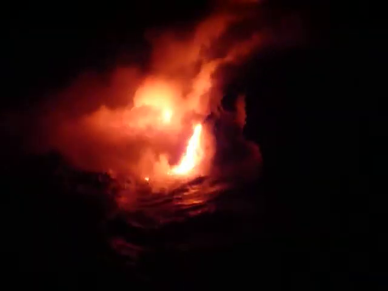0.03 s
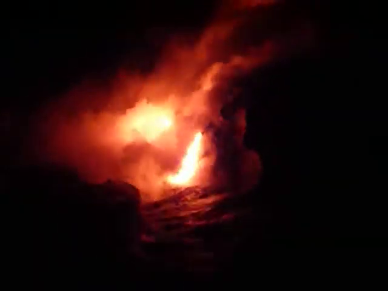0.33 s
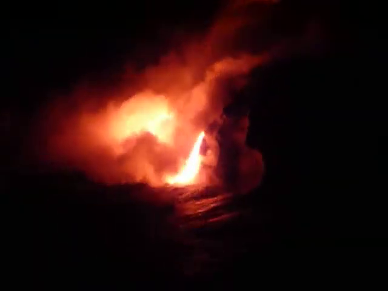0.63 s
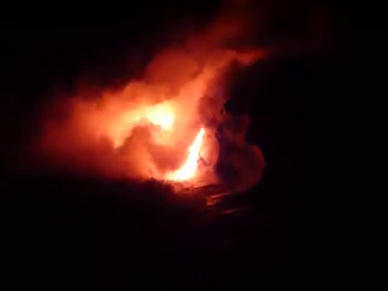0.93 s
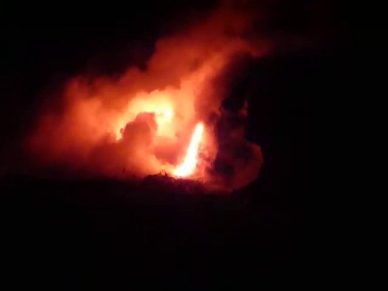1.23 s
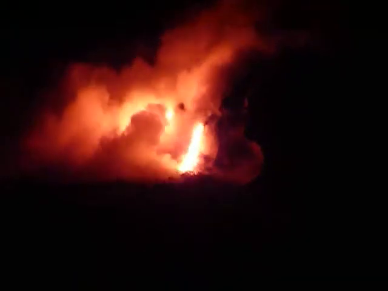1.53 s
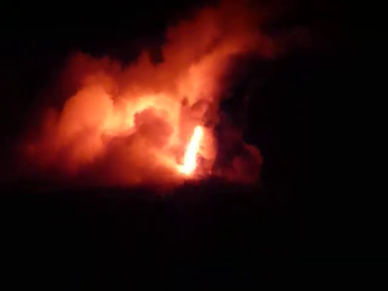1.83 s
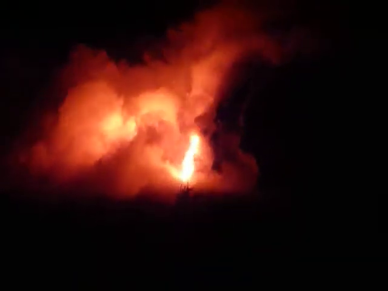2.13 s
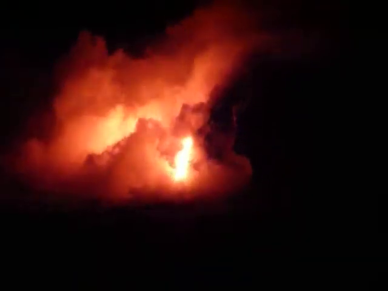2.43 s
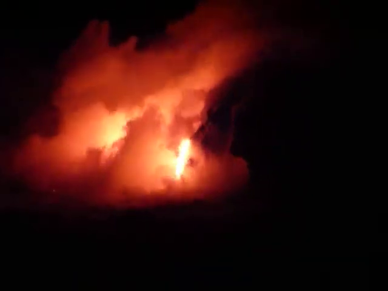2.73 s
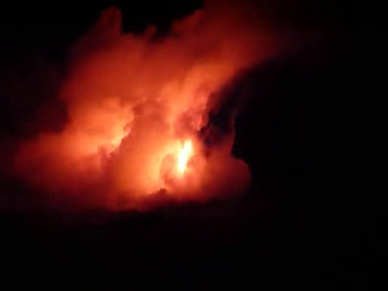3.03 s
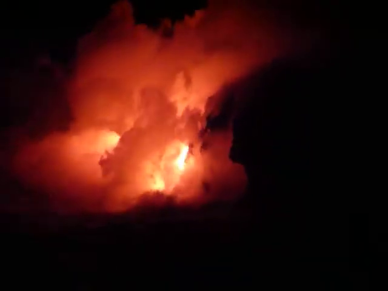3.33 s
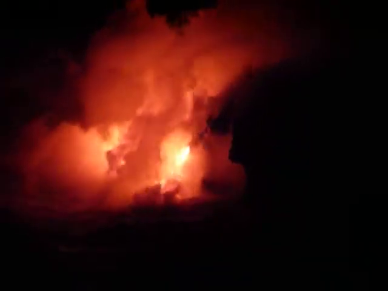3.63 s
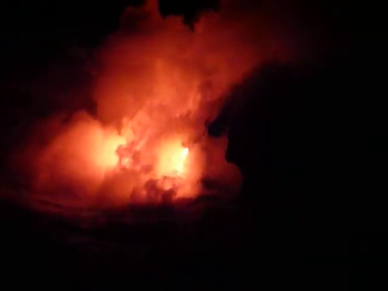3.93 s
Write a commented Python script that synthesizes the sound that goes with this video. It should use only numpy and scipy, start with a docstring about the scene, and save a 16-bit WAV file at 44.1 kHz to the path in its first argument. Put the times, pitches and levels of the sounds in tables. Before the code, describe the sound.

Uneven gusts of wind thump and rasp on an outdoor microphone, with one tiny, close crackle near the start. Underneath, quiet surf and the distant hiss of lava steaming in the sea continue, the hiss rising twice.

```python
"""Gusts buffet a camera's microphone: vortices roll off it, strong eddies thump, rasp and duck its gain.
Some way off, lava pours into the sea at night. Steam hisses, swelling twice as water meets hot rock,
and surf washes the shore. Something small crackles once, close by; two faint ticks come later."""
import sys
import numpy as np
from scipy import signal
from scipy.fft import rfft, irfft, next_fast_len
from scipy.io import wavfile
from scipy.ndimage import uniform_filter1d, map_coordinates

SR = 44100
rng = np.random.default_rng(int(sys.argv[2]) if len(sys.argv) > 2 else 0)


def transcribe(u):
    """Save the signal u as a 16-bit wav file named by the first command-line argument.

    u: samples, shape (n,) or (channels, n), limited to [-1, 1]; the rate is SR.
    q: integer samples, one column per channel.
    """
    v = np.clip(np.atleast_2d(u).T, -1, 1)
    q = np.round(v * 32767).astype(np.int16)
    wavfile.write(sys.argv[1], SR, q)


N = 176400

# Gusts at the microphone. Each row: start in seconds, length in seconds, level in dB, rumble pitch in Hz.
GUSTS = [(0, 0.004, -8.5, 252.6), (0.021, 0.034, -22.5, 191), (0.069, 0.044, -21.5, 172),
         (0.112, 0.032, -41, 146), (0.154, 0.018, -31.5, 245), (0.184, 0.035, -35.5, 189),
         (0.281, 0.11, -28, 179.7), (0.365, 0.018, -23.5, 232.7), (.41, 0.052, -30, 158),
         (0.588, 0.061, -36.5, 136.4), (0.714, 0.0077, -22.5, 190), (0.747, 0.085, -28.5, 168.9),
         (0.786, 0.025, -26, 191), (0.896, 0.021, -30.5, 182), (0.986, 0.018, -35.5, 133.4),
         (1.229, 0.346, -32, 159.2), (1.265, 0.085, -22, 223), (1.479, 0.04, -22.5, 231),
         (1.537, 0.046, -27, 216.8), (1.615, 0.11, -32.5, 167.2), (1.645, 0.021, -22.5, 190.8),
         (1.74, 0.19, -34.5, 159.4), (1.762, 0.0087, -23, 215), (1.82, 0.034, -25.5, 160.5),
         (1.983, 0.038, -23, 179.4), (2.028, 0.028, -25, 185.5), (2.368, 0.067, -42, 132),
         (2.595, 0.096, -21, 185.4), (2.711, 0.1335, -22, 219.6), (2.845, 0.076, -25.5, 179),
         (2.942, 0.119, -21.5, 220), (3.1, 0.083, -27, 193.4), (3.198, 0.074, -23, 221),
         (3.288, .042, -24, 228.2), (3.333, 0.273, -25.5, 215.6), (3.378, 0.073, -21, 232.6),
         (3.512, 0.014, -21.5, 312), (3.555, 0.012, -22.5, 207.4), (3.618, 0.12, -28.5, 197.6),
         (3.635, 0.033, -25.5, 286.7), (3.795, 0.023, -25, 155), (3.844, 0.0036, -22.5, 148)]
# Eddy strikes. Each row: centre in seconds, thump level in dB, thump pitch in Hz, crack level in dB,
# crack pitch in Hz.
EDDIES = [(0.0259, -4.5, 187, -13.5, 948), (.0875, -2, 168, -28, 850), (0.318, -3.5, 215, -21, 800),
          (0.369, -15.5, 290, -42, 950), (0.3821, -1.5, 245, -19.5, 690), (0.451, -16.5, 196, -46, 700),
          (0.7234, -11.5, 230, -16, 744), (0.7408, -17.5, 150, -17, 840), (0.7582, -22, 202, -16.5, 920),
          (1.2875, -7.5, 121.6, -22, 750), (1.2896, -5, 229, -13.5, 1060), (1.31, -7.5, 237, -41, 800),
          (1.3198, -9.5, 275, -34, 860), (1.334, -10.5, 223, -40, 696), (1.338, -5, 293, -16.5, 1400),
          (1.3608, -5, 163, -21, 1264), (1.4908, -5.5, 290, -9.5, 973), (1.4984, -1.5, 240, -12.5, 1238),
          (1.5145, -35, 260, -15.5, 1630), (1.518, -7.5, 215, -20, 1190), (1.5222, -12, 288, -16.5, 900),
          (1.547, -10.5, 180, -24, 900), (1.5608, -36, 200, -28.5, 1520), (1.6493, -7.5, 186, -21, 686),
          (1.663, -13, 247, -45, 870), (1.8459, -8.5, 191, -22, 678), (1.853, -11, 187, -48, 708),
          (2.0031, -8, 214, -21, 690), (2.0121, -11, 162, -22.5, 750), (2.615, -10.5, 215, -35, 650),
          (2.636, -7.5, 167, -35, 695), (2.669, -9, 276, -29, 700), (2.733, -21.5, 260, -27, 655),
          (2.753, -19.5, 210, -17, 708), (2.7959, -14, 250, -16, 1263), (2.803, -11.5, 280, -24, 860),
          (2.816, -20.5, 278, -21, 940), (2.833, -25.5, 232, -18.5, 935), (2.941, -6, 240, -16, 853),
          (2.9924, -7, 267, -18.5, 874), (3.005, -14, 290, -23, 1104), (3.048, -9.5, 189, -19.5, 1100),
          (3.0832, -2.5, 240, -35, 800), (3.2356, -4.5, 257, -19.5, 910), (3.41, -9, 204, -27.5, 700),
          (3.4362, -8.5, 269, -24, 700), (3.482, -13.5, 324, -23.5, 1040), (3.4926, -12.5, 310, -17.5, 990),
          (3.514, -12, 290, -26, 847), (3.663, -11.5, 300, -20, 710), (3.701, -10, 202, -45, 706)]
# Vortex trains. Each row: centre in seconds, half-width in seconds, peak in dB, shedding rate in Hz.
SWIRLS = [(0.037, 0.0084, -14.5, 360), (0.343, 0.0024, -9.5, 190), (0.736, 0.0023, -10, 330),
          (.909, 0.0048, -17.5, 205), (2.662, 0.0033, -12, 267), (2.754, 0.0037, -16, 207),
          (2.797, 0.00095, -22.5, 1510), (2.961, 0.0062, -16, 210), (3.074, .011, -14, 263),
          (3.13, 0.0044, -15, 310), (3.212, 0.0034, -9.5, 206), (3.246, 0.021, -18.5, 212),
          (3.314, 0.013, -19, 236), (3.374, 0.013, -19, 242), (3.406, 0.019, -20, 260),
          (3.436, 0.0042, -13.5, 320), (3.555, 0.0088, -14.5, 215), (3.687, .005, -18.5, 158)]
# Wind spectra. Each row: frequency in Hz, relative gain in dB.
BUFFET_SPECTRUM = [(15, -31.5), (45, -8), (90, 0), (190, 0.5), (280, -4), (450, -11), (700, -24),
                   (1100, -40), (2000, -63.5), (4000, -89)]
RASP_SPECTRUM = [(150, -20), (450, 0.5), (850, -3), (1300, -10), (1900, -21.5), (2800, -28.5),
                 (5000, -49.5), (9000, -69.5)]
THUMP_SPECTRUM = [(15, -44.5), (60, -6.5), (150, -3), (260, -0.5), (410, -9), (700, -26), (1200, -46.5),
                  (3000, -70)]
TEAR_SPECTRUM = [(150, -23), (500, 8.5), (1000, -2), (1600, -15.5), (2200, -19), (3000, -33), (5000, -43.5),
                 (9000, -69)]
# Steam and surf envelopes. Each row: time in seconds, level in dB.
STEAM_LEVELS = [(0, -54.5), (.28, -55), (.6, -57), (.95, -57), (1.1, -55.5), (1.28, -54), (1.45, -57),
                (1.7, -57), (1.9, -54), (2.15, -48), (2.4, -47), (2.75, -48.5), (3, -51), (3.2, -53),
                (3.45, -52), (3.65, -45.5), (4, -43.5)]
SURF_LEVELS = [(0, -48), (.5, -49), (.7, -47.5), (1, -49.5), (1.22, -44.5), (1.45, -51.5), (1.8, -44.5),
               (2.2, -45.5), (2.6, -46), (3.3, -44.5), (3.7, -44.5), (4, -39)]
# Steam and surf spectra. Each row: frequency in Hz, relative gain in dB.
HISS_SPECTRUM = [(300, -17.5), (1000, -9), (1800, 1.5), (2300, -3), (2700, 1), (3300, 3), (4200, 0),
                 (5000, -2), (6500, -7), (7500, -10), (8000, -11.5), (8600, -27.5)]
WASH_SPECTRUM = [(60, -9), (200, -3.5), (380, -6), (600, -1.5), (850, -8.5), (1150, -9.5), (1700, -14.5),
                 (2600, -24), (6000, -54.5)]
BREAKER_SPECTRUM = [(20, -2), (45, 4.5), (90, 11.5), (180, -3), (350, -6.5), (900, -46)]
# Close snaps and faint ticks. Each row: start in seconds, level in dB.
SNAPS = [(.4817, -29), (.4828, -29), (0.4876, -31), (0.4899, -20), (0.4935, -30), (0.496, -26.5),
         (0.4988, -29.5)]
TICKS = [(3.027, -47), (3.704, -42.5)]
# Snap and tick spectra. Each row: frequency in Hz, relative gain in dB.
SNAP_SPECTRUM = [(300, -39.5), (1000, -7.5), (1500, -15.5), (1900, -10), (2450, 4.5), (3000, -6.5),
                 (3700, -13), (4400, -27), (5000, -11), (6100, -17), (8000, -29), (9000, -54)]
TICK_SPECTRUM = [(1000, -33), (4500, -9.5), (6800, 1.5), (8000, -6), (9000, -23.5)]
# Camera notch filters. Each row: centre in Hz, width in Hz.
NOTCHES = [(5400, 350), (7700, 370), (8300, 500)]

GUST_ATTACK_S, GUST_RELEASE_S = 0.0046, 0.008
BUFFET_REF_HZ, TEAR_REF_HZ = 188.8, 1089  # pitches that leave buffet/thump and tear spectra unshifted
RASP_DB, RASP_REF_DB, RASP_EXPONENT = -31.5, -16.5, 1.81  # RASP_DB at a gust level of RASP_REF_DB
CORE_DB, TEAR_DB = -5.5, -8.5  # relative to the eddy's crack level
CORE_HALF_WIDTH_CYCLES, TEAR_HALF_WIDTH_S = 0.42, 0.0022
RING_HZ, RING_DB = 2950, -15
THRESHOLD_DB, RECOVER_DB_PER_S, SMOOTH_S, CUTOFF_HZ = -5, 32, 0.0055, 8700


def gusts():
    """Each gust rises, holds and falls with a fluttering rumble; the harder it blows, the more it rasps."""
    t, power, rumble = clock(), np.zeros(N), np.zeros(N)
    flutter = unit(amp(2 * wobble(rate_hz=110)))
    air = noise(BUFFET_SPECTRUM)
    for start_s, length_s, db, hz in GUSTS:
        age_s = t - start_s
        near = (age_s > -10 * GUST_ATTACK_S) & (age_s < length_s + 10 * GUST_RELEASE_S)
        rise = np.maximum(-age_s[near], 0) / GUST_ATTACK_S
        fall = np.maximum(age_s[near] - length_s, 0) / GUST_RELEASE_S
        force = amp(db) * np.exp(-rise - fall)
        position = rng.uniform(0, N) + age_s[near] * SR * hz / BUFFET_REF_HZ  # read speed sets pitch
        rumble[near] += force * map_coordinates(air, [position % (N - 1)], order=1)
        power[near] += force ** 2
    rasp = amp(RASP_DB) * (np.sqrt(power) * flutter / amp(RASP_REF_DB)) ** RASP_EXPONENT
    flicker = unit(amp(12.5 * wobble(rate_hz=92)))
    return rumble * flutter + rasp * flicker * noise(RASP_SPECTRUM)


def eddies():
    """An eddy hits the port: one pressure swing, higher if it passes faster, plus a crack and torn air."""
    t, out, air = clock(), np.zeros(N), noise(TEAR_SPECTRUM)
    pulse = irfft(colour(THUMP_SPECTRUM, np.fft.rfftfreq(N, 1 / SR)), N)
    swing = signal.hilbert(np.roll(pulse, N // 2) / pulse[0])  # analytic, so its phase can be turned
    for centre_s, thump_db, thump_hz, crack_db, crack_hz in EDDIES:
        thump_rad, core_rad = rng.uniform(0, 2 * np.pi, 2)
        near = np.abs(t - centre_s) < .05
        age_s = t[near] - centre_s
        stretched = np.interp(age_s * thump_hz / BUFFET_REF_HZ, t - t[N // 2], swing)
        thump = (stretched * np.exp(1j * thump_rad)).real
        tone = np.cos(2 * np.pi * crack_hz * age_s + core_rad)
        core = bell(age_s * crack_hz / CORE_HALF_WIDTH_CYCLES) * tone
        pitched_air = np.interp(centre_s + age_s * crack_hz / TEAR_REF_HZ, t, air)
        tear = bell(age_s / TEAR_HALF_WIDTH_S) * pitched_air
        crack = amp(CORE_DB) * core + amp(TEAR_DB) * tear
        out[near] += amp(thump_db) * thump + amp(crack_db) * crack
    return out


def swirls():
    """Flow sheds short vortex trains off the housing: a hollow, wavering swell, or a chirp when fast."""
    t, out = clock(), np.zeros(N)
    flow_time_s = np.cumsum(1 + .1 * wobble(rate_hz=120)) / SR  # shedding rate wanders about 10 %
    for centre_s, half_width_s, db, hz in SWIRLS:
        age_s = flow_time_s - np.interp(centre_s, t, flow_time_s)
        phase_rad = 2 * np.pi * hz * age_s + rng.uniform(0, 2 * np.pi)
        out += amp(db) * bell((t - centre_s) / half_width_s) * np.cos(phase_rad)
    return out


def steam():
    """Smooth, distant hiss that swells as water reaches the lava."""
    level_db = curve(STEAM_LEVELS) + 0.32 * wobble(rate_hz=12)
    return amp(level_db) * rush(HISS_SPECTRUM, patchy_db=0.6)


def surf():
    """Washing water over the rumble of far breakers."""
    wash_db = curve(SURF_LEVELS) + 0.35 * wobble(rate_hz=19)
    wash = amp(wash_db) * rush(WASH_SPECTRUM, patchy_db=2.5)
    breakers_db = -50.5 + 2.3 * wobble(rate_hz=4.5)
    return wash + amp(breakers_db) * noise(BREAKER_SPECTRUM)


def crackle():
    """A quick run of tiny dry snaps with a faint ring; later, two faint high ticks."""
    snaps = noise(SNAP_SPECTRUM) * decays(SNAPS, t60_s=0.0093)
    ring_gain = amp(RING_DB) * decays(SNAPS, t60_s=0.11) / len(SNAPS)
    ring = ring_gain * np.sin(2 * np.pi * RING_HZ * clock())
    ticks = noise(TICK_SPECTRUM) * decays(TICKS, t60_s=.03)
    return snaps + ring + ticks


def amp(db):
    """Decibels to gain."""
    return 10 ** (np.asarray(db) / 20)


def unit(x):
    """x at rms 1."""
    return x / np.sqrt(np.mean(x ** 2) + 1e-20)


def clock():
    """Sample times in seconds."""
    return np.arange(N) / SR


def curve(rows):
    """(seconds, value) rows joined by straight lines."""
    return np.interp(clock(), *np.transpose(rows))


def bell(half_widths):
    """Gaussian swell."""
    return np.exp(-np.minimum(.5 * half_widths ** 2, 20))


def decays(rows, t60_s):
    """Sum of sudden onsets, each dying away."""
    t = clock()
    return sum(amp(db - 60 * np.clip((t - s) / t60_s, 0, 2)) * (t >= s) for s, db in rows)


def wobble(rate_hz):
    """Smooth random curve through unit-variance knots."""
    return map_coordinates(rng.standard_normal(N // 20), [clock() * rate_hz + 2], mode="mirror")


def filtered(x, response):
    """x through a frequency response."""
    size = next_fast_len(N + SR // 2)
    return irfft(rfft(x, size) * response(np.fft.rfftfreq(size, 1 / SR)), size)[:N]


def colour(spectrum, hz):
    """Gain of a spectrum at hz, interpolated on log axes."""
    knots_hz, db = np.transpose(spectrum)
    return amp(np.interp(np.log(hz + 1), np.log(knots_hz + 1), db))


def noise(spectrum):
    """Coloured noise of rms 1."""
    return unit(filtered(rng.standard_normal(N), lambda hz: colour(spectrum, hz)))


def rush(spectrum, patchy_db):
    """Coloured noise whose gain drifts in patches of time and frequency."""
    bins = signal.stft(noise(spectrum), nperseg=512)[2]
    patches = uniform_filter1d(rng.standard_normal(bins.shape), size=6, axis=0)
    patches = uniform_filter1d(patches, size=14, axis=1)
    return unit(signal.istft(bins * amp(patchy_db * unit(patches)), nperseg=512)[1][:N])


def scene():
    """Shore and wind at one microphone."""
    return (steam() + surf() + gusts() + eddies() + swirls() + crackle())[None]


def record(dry):
    """The camera ducks its gain on peaks, recovers slowly, notches three pitches and cuts the top."""
    def response(hz):
        notches = [(centre_hz ** 2 - hz ** 2) / (centre_hz ** 2 - hz ** 2 + 1j * hz * width_hz)
                   for centre_hz, width_hz in NOTCHES]
        return np.prod(notches, axis=0) * (hz < CUTOFF_HZ)

    over_db = np.maximum(20 * np.log10(np.abs(dry[0]) + 1e-9) - THRESHOLD_DB, 0)
    recovery_db = RECOVER_DB_PER_S * clock()
    duck_db = np.maximum.accumulate(over_db + recovery_db) - recovery_db
    ducked = dry[0] * amp(-uniform_filter1d(duck_db, int(SMOOTH_S * SR)))
    return filtered(ducked, response)[None]


dry = scene()
out = record(dry)
transcribe(out)
```